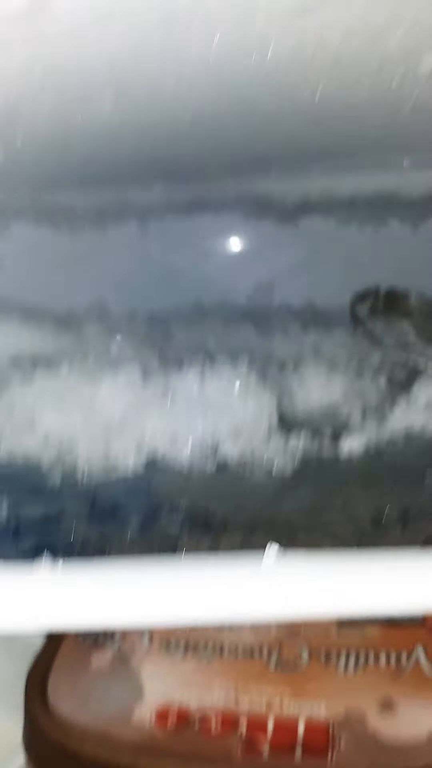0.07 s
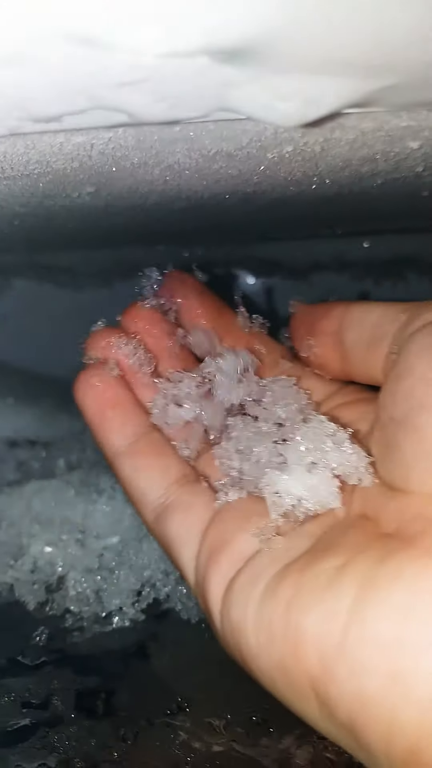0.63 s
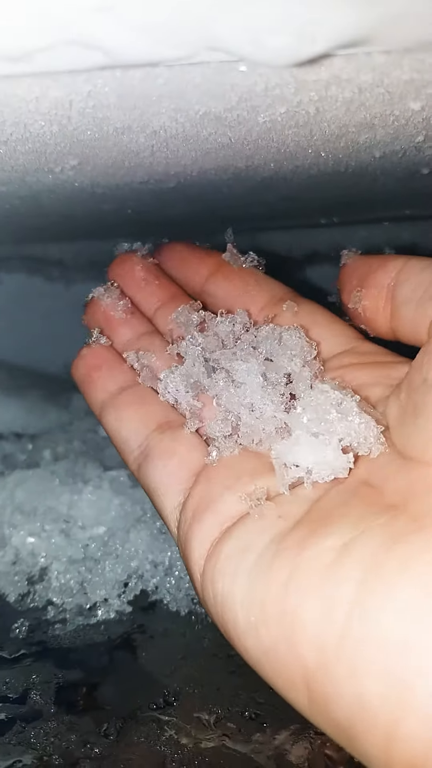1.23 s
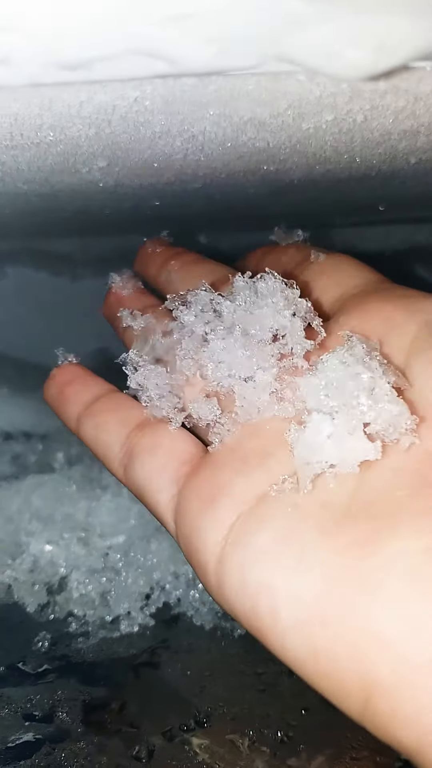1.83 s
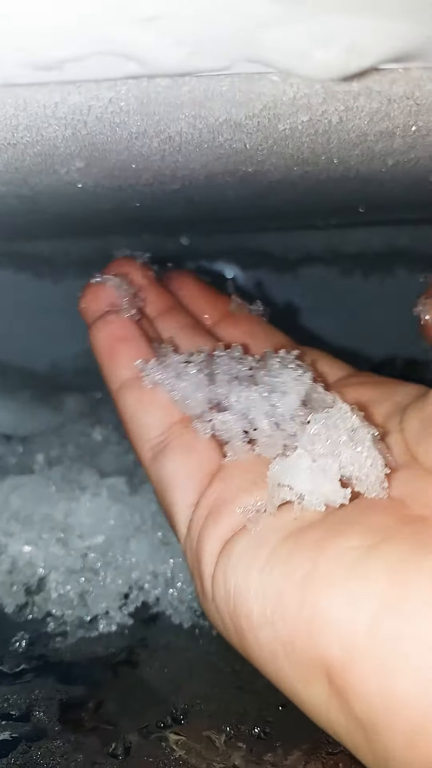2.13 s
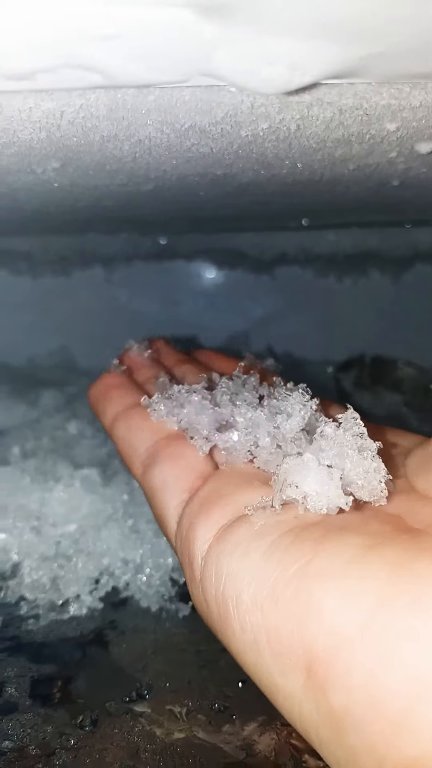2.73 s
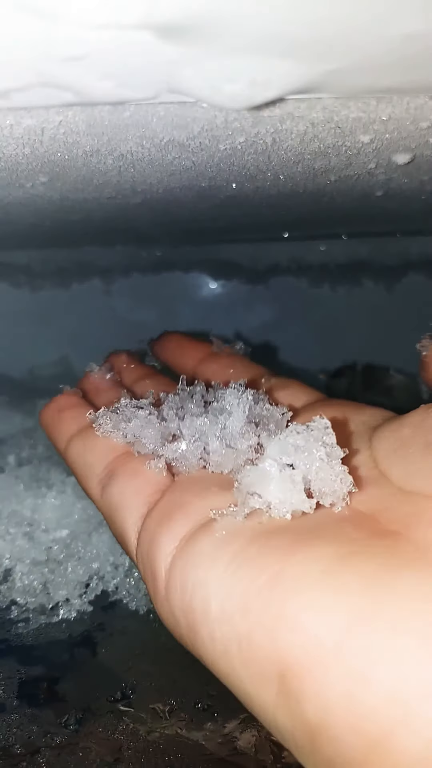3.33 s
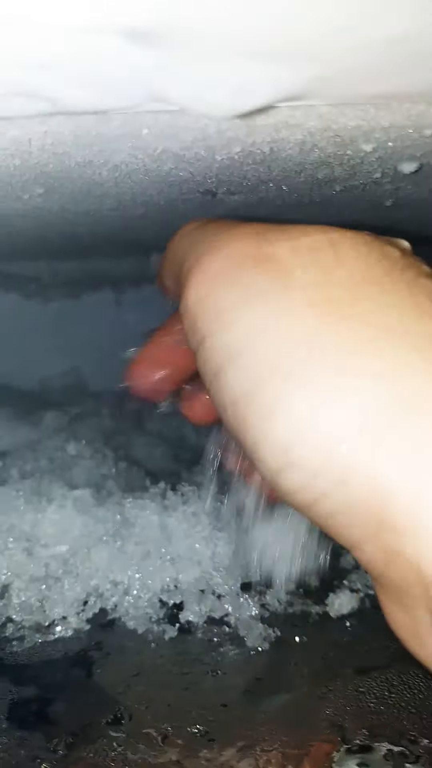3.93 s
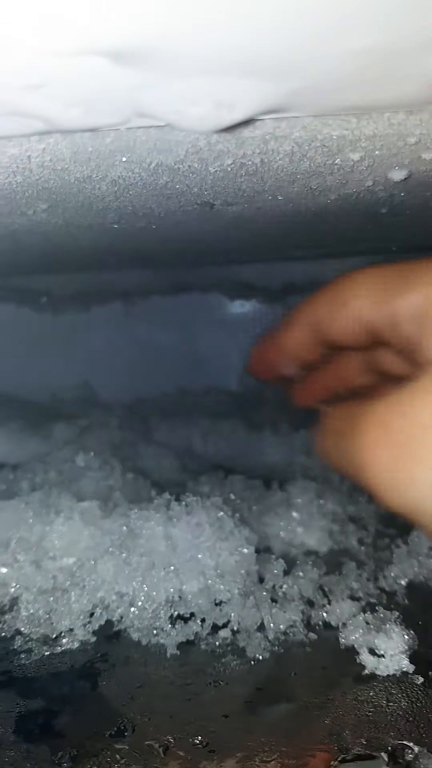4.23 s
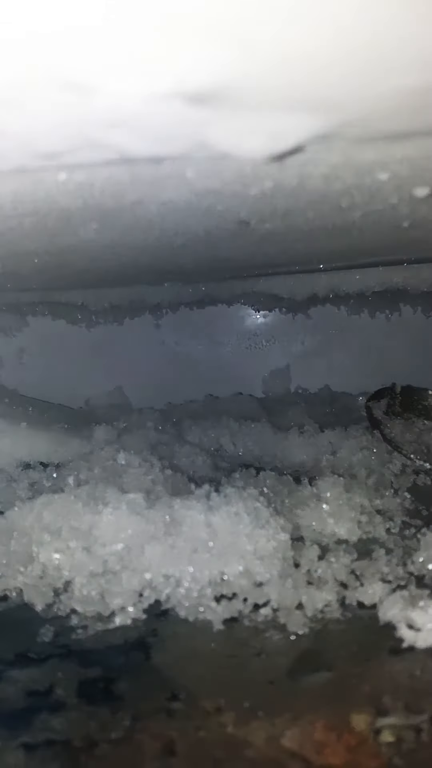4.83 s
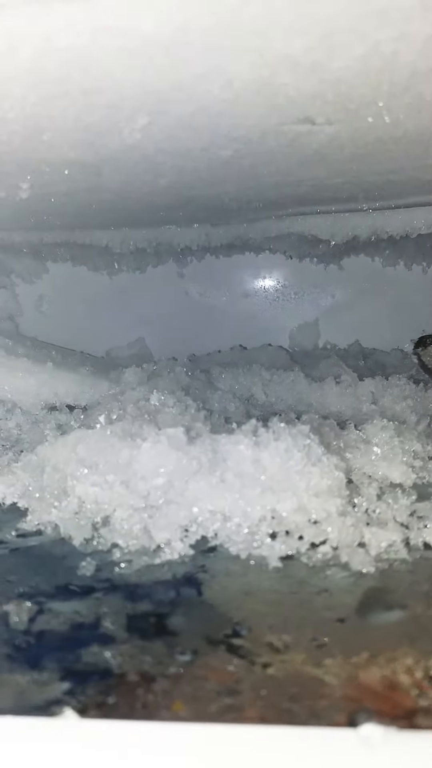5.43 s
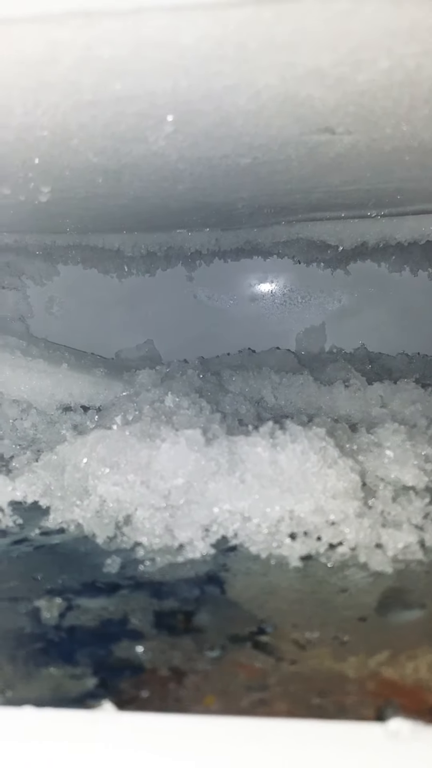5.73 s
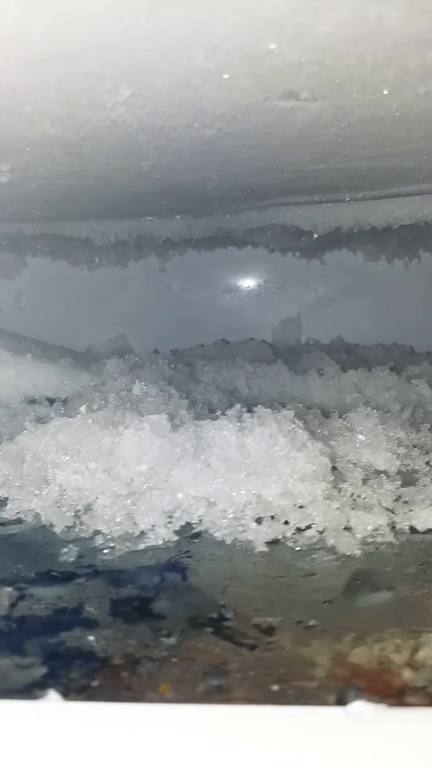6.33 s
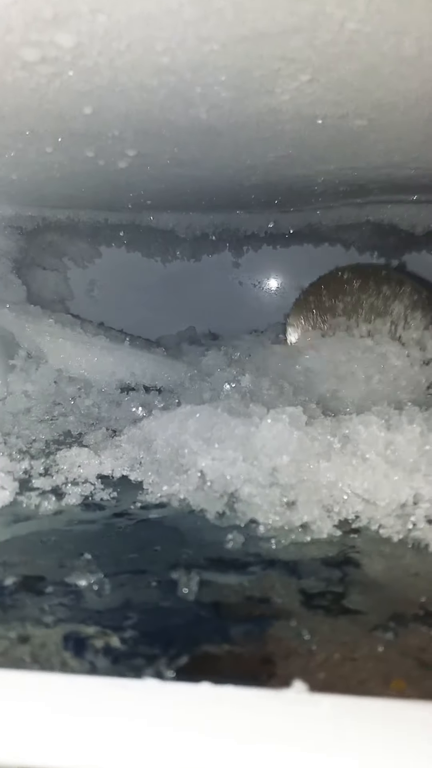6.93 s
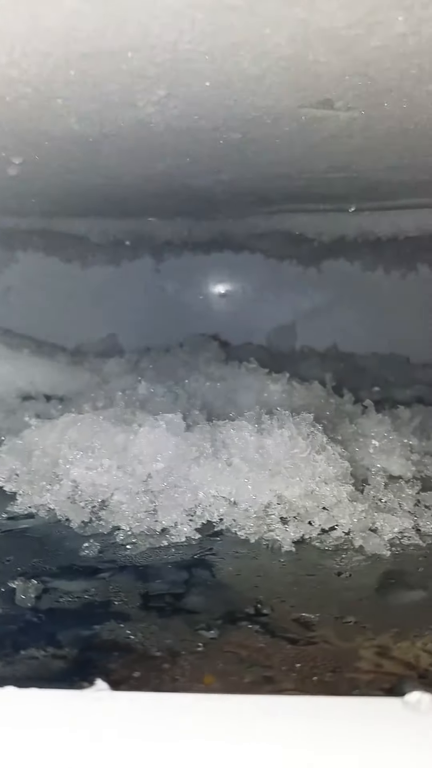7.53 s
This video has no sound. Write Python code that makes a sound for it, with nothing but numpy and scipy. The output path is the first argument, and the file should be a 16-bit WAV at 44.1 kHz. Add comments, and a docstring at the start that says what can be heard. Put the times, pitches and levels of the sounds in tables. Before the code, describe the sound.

A metal spoon scrapes crunchy frost out of a small freezer, snapping ice and knocking on hollow walls over a faint motor hum.

```python
"""First comes a faint crackle of loose frost, close by, over a motor humming in the room.
Then a metal spoon scrapes out a small freezer compartment, push after push. Coarse ice grains
crunch under its edge, fine ones fizz, and later the bare edge sings as crystals catch on it.
Lumps snap off with a spray of splinters, and the spoon knocks on the hollow walls, which thump
and ring. The work is loudest near the end, and the ice and knocks echo briefly in the compartment."""
import sys
import numpy as np
from scipy import signal
from scipy.fft import rfft, irfft
from scipy.io import wavfile

SR = 44100
rng = np.random.default_rng(int(sys.argv[2]) if len(sys.argv) > 2 else 0)


def dump(signal):
    """Clip the signal to [-1, 1] and save it as 16-bit WAV at the path in sys.argv[1]."""
    limited = np.clip(np.atleast_2d(signal).T, -1, 1)
    pcm = np.round(limited * 32767).astype(np.int16)
    wavfile.write(sys.argv[1], SR, pcm)


N = 338688
TIME = np.arange(N) / SR
HIT_TIME = np.arange(SR * 3 // 5) / SR  # seconds since one hit began


def gain_of(db):
    """Turns decibels into a number to multiply a sound by."""
    return 10 ** (np.asarray(db) / 20)


def evened(x):
    """Scales a sound to an average strength (rms) of 1."""
    return x / np.sqrt(np.mean(x ** 2) + 1e-20)


def even_start(x):
    """Scales a dying sound to an average strength of 1 over its first 30 ms."""
    return x / np.sqrt(np.mean(x[:round(.03 * SR)] ** 2) + 1e-20)


def add(mix, s, sound):
    """Mixes a sound in at s seconds."""
    part = mix[max(round(s * SR), 0):][:len(sound)]
    part += sound[:len(part)]


def look_up(points, hz):
    """Reads a table between its rows, on a musical (logarithmic) frequency scale."""
    f, value = np.transpose(points)
    return np.interp(np.log(hz + 1), np.log(f + 1), value)


def colour(x, tone, size=4096):
    """Shapes bass and treble by a tone table, in a way that keeps the start of clicks sharp."""
    log_gain = np.log(gain_of(look_up(tone, abs(np.fft.fftfreq(size, 1 / SR)))))
    taps = np.fft.ifft(np.exp(np.conj(signal.hilbert(log_gain)))).real
    return signal.fftconvolve(x, taps[:size // 2])[:len(x)]


def wander(per_s):
    """A smooth random wobble; a higher per_s makes it quicker."""
    keep_slow = np.exp(-(np.fft.rfftfreq(N, 1 / SR) / per_s) ** 2)
    return evened(irfft(rfft(rng.standard_normal(N)) * keep_slow, N))


def ring(notes, stretch=1):
    """The dying notes of a struck object. A fade time is how long a sound takes to drop 60 dB."""
    return sum((-1) ** k * gain_of(db - 60 * HIT_TIME / fade_s)
               * np.sin(2 * np.pi * hz * stretch * HIT_TIME)
               for k, (hz, db, fade_s) in enumerate(notes))


def burst(fade_s, rise_s=0.00072):
    """A shower of tiny cracks that spreads quickly and dies."""
    noise = rng.standard_normal(len(HIT_TIME))
    return noise * gain_of(-60 * HIT_TIME / fade_s) * (1 - np.exp(-HIT_TIME / rise_s))


def toned_burst(tone, fade_s, rise_s=0.00072):
    """A burst shaped by a tone table."""
    return even_start(colour(burst(fade_s, rise_s), tone))


def clicks(per_s, spread_db):
    """Random clicks, most small and a few large."""
    out = np.zeros(N)
    when, size, sign = rng.random((round(per_s * N / SR), 3)).T
    size_db = spread_db * np.minimum(-np.log(1 - size), 4)
    out[(when * N).astype(int)] = np.sign(sign - .5) * gain_of(size_db)
    return out


def grains(per_s, spread_db, clump_db):
    """Crystals click as they break; clump_db bunches the sound into clumps."""
    return evened(clicks(per_s, spread_db) * gain_of(clump_db * wander(92)))


def chips(per_s, spread_db, lo_hz, hi_hz, cycles, count=20):
    """Ice chips of many sizes, each ringing a few cycles at its own pitch."""
    out = np.zeros(N)
    for hz in np.geomspace(lo_hz, hi_hz, count):
        decay = np.exp(-hz / cycles / SR)
        feedback = [1, -2 * decay * np.cos(2 * np.pi * hz / SR), decay * decay]
        hits = clicks(per_s / count, spread_db) + 1e-12
        out += np.sqrt(hz) * evened(signal.lfilter([1, 0, -1], feedback, hits))
    return evened(out)


def push(start, attack, hold, fall_db_per_s, onset_db=-21):
    """The loudness of one push or touch: it swells, holds and eases off."""
    t = TIME - start
    swell = np.clip(t / max(attack, 1 / SR), 0, 1)
    return (t > 0) * gain_of(onset_db * (1 - swell) - fall_db_per_s * np.maximum(t - attack - hold, 0))


# tone of the air in the room: (frequency [Hz], level [dB])
AIR_TONE = [(25, -9), (60, -12), (100, -7.5), (120, 1.5), (160, -18), (280, -4), (400, -7), (520, -11),
            (1300, -13), (2200, -16), (3200, -24.5), (5500, -31), (7500, -34.5), (16000, -41)]
# the motor's low notes and its thin high ones: (pitch [Hz], level [dB])
HUM_NOTES = [(113, -59), (226, -72.5), (339, -80)]
WHINE_NOTES = [(5652, -91), (5766, -77.5), (5825, -85), (5879, -84), (5992, -81.5), (8140, -92)]
# slow changes of the motor: (time [s], hum change [dB], whine change [dB])
MOTOR_CHANGES = [(0, -0.5, -5), (.7, 1, -3.5), (1.9, -2.5, -0.5), (3.4, -3, -5.5), (3.9, 3.5, -5),
                 (7.7, 5, 1.5)]
def room():
    """Soft air noise, and a motor with a wavering hum and a thin high whine."""
    air = gain_of(-56.5) * evened(colour(rng.standard_normal(N), AIR_TONE)) * gain_of(.5 * wander(4.8))
    drift = 0.14 * wander(1)
    hum = sum(gain_of(db) * evened(np.sin(2 * np.pi * (hz * TIME + drift))) for hz, db in HUM_NOTES)
    whine = sum(gain_of(db) * evened(np.sin(2 * np.pi * (hz * TIME + 0.043 * wander(4.2))))
                for hz, db in WHINE_NOTES)
    times, hum_db, whine_db = np.transpose(MOTOR_CHANGES)
    hum *= gain_of(np.interp(TIME, times, hum_db) + 1.3 * wander(9) - 1)
    whine *= gain_of(np.interp(TIME, times, whine_db) - 0.5)
    return air + hum + whine


# how long the echoes last: (frequency [Hz], fade time [s])
ECHO_FADES = [(150, 0.39), (1000, 0.56), (1900, 0.58), (2600, 0.21), (4000, 0.21), (16000, 0.059)]
def echoes(x):
    """Dense echoes of the compartment and the room outside; the treble dies first."""
    hz, t, bands = signal.stft(rng.standard_normal(len(HIT_TIME)), SR, nperseg=256)
    fade = gain_of(-60 * t / look_up(ECHO_FADES, hz)[:, None])
    tail = signal.istft(bands * fade, SR, nperseg=256)[1][:len(HIT_TIME)]
    tail *= 1 - np.exp(-HIT_TIME / 0.0012)
    return signal.fftconvolve(x, tail / np.linalg.norm(tail))[:N]


# tone of tiny ice splinters: (frequency [Hz], level [dB])
SPLINTER_TONE = [(2000, 3), (4500, 0), (5800, -1.5), (7000, -4), (9300, 1.5), (10800, -6), (16000, -2)]
# tone of a soft, breathy rustle of handling, perhaps a sleeve: (frequency [Hz], level [dB])
RUSTLE_TONE = [(100, -9), (300, 2), (900, -5), (1700, 2.5), (2800, -7), (3300, -10), (3800, 1), (4600, -14),
               (6000, -7), (7500, -19), (16000, -28)]
# light touches before the scraping: (start [s], swell [s], hold [s], crackle [dB], rustle [dB])
LIGHT_TOUCHES = [(.12, 0.045, 0.27, -76, -58.5), (0.385, 0.044, .05, -59, -59.5),
                 (0.546, 0.031, 0.067, -62, -61.5), (.69, 0.044, 0.037, -58.5, -66),
                 (1.8, 0.088, .03, -66, -65)]
def crackle():
    """Separate crystals of loose frost give way under light pressure, over a soft handling rustle."""
    crystals, rustle = np.zeros((2, N))
    for *timing, crackle_db, rustle_db in LIGHT_TOUCHES:
        crystals = np.maximum(crystals, gain_of(crackle_db) * push(*timing, fall_db_per_s=165))
        rustle = np.maximum(rustle, gain_of(rustle_db) * push(*timing, fall_db_per_s=87))
    breaks = colour(grains(per_s=1200, spread_db=3, clump_db=2), SPLINTER_TONE)
    return crystals * evened(breaks) + rustle * evened(colour(rng.standard_normal(N), RUSTLE_TONE))


# the spoon's own notes, muffled by frost: (pitch [Hz], level [dB], fade time [s])
SPOON_NOTES = [(4554, 0, .08), (6132, -3, .07), (7650, -10, .04), (8150, -6, .05), (9030, 0, .06),
               (9260, -5, .04), (11080, -7, .06), (13900, -13, .04)]
def singing(fizz, bare_from_s=5.3, fade_s=0.016):
    """Once bare, the edge catches on hard crystals and sings; pressed into frost, it rings briefly."""
    catches = grains(per_s=500, spread_db=3, clump_db=2)
    out = np.zeros(N)
    for hz, db, _ in SPOON_NOTES[1:]:
        pole = gain_of(-60 / fade_s / SR) * np.exp(2j * np.pi * hz / SR)  # makes each click ring at hz
        contact = gain_of(3 * wander(10))  # as the edge slides, different notes stand out
        out += gain_of(db) * contact * evened(signal.lfilter([1], [1, -pole], catches).imag)
    return gain_of(-9.5) * fizz * (TIME > bare_from_s) * evened(out)


# pushes through the frost: (start [s], swell [s], hold [s], pressure on the wall [dB], fizz [dB])
SPOON_PUSHES = [(3.63, 0.097, 0.077, -52.5, -49.5), (3.906, .008, 0.02, -44, -51),
                (3.987, 0.042, 0.078, -44.5, -46.5), (4.303, 0.0073, 0.11, -44.5, -65.5),
                (4.609, 0.019, 0.035, -46.5, -54), (4.858, 0.14, 0.035, -44.5, -53),
                (5.297, 0.017, 0.016, -42, -52), (5.395, 0.041, 0.14, -44, -51.5),
                (5.602, 0.021, 0.013, -43.5, -53.5), (5.732, 0.02, 0.028, -45.5, -57),
                (5.847, 0.052, 0.085, -43.5, -48.5), (6.0, .04, 0.19, -51, -57),
                (6.285, 0.0072, 0.011, -38.5, -47.5), (6.39, .04, .025, -43, -53),
                (6.47, 0.059, 0.19, -38, -44), (6.646, 0.09, 0.12, -28, -39.5),
                (6.878, 0.028, 0.074, -36.5, -42), (6.996, 0.042, .2, -47, -56.5),
                (7.302, .008, 0.013, -33.5, -51)]
def strokes():
    """Loudness curves for drag, crunch and fizz; the harder the push, the more coarse grains break."""
    drag, crunch, fizz = np.zeros((3, N))
    for *timing, pressure_db, fizz_db in SPOON_PUSHES:
        crunch_db = -52.5 + 0.76 * (pressure_db + 45.5)
        drag = np.maximum(drag, gain_of(pressure_db) * push(*timing, fall_db_per_s=110))
        crunch = np.maximum(crunch, gain_of(crunch_db) * push(*timing, fall_db_per_s=79))
        fizz = np.maximum(fizz, gain_of(fizz_db) * push(*timing, fall_db_per_s=179))
    return drag, crunch, fizz


# tones of coarse grains breaking, and of the shaken wall: (frequency [Hz], level [dB])
CRUNCH_TONE = [(400, -42), (1000, -1), (1700, -2), (2600, -5.5), (3500, -11), (5000, -19), (7000, -17.5),
               (16000, -41)]
DRAG_TONE = [(40, -41), (80, 4.5), (160, 10.5), (220, 7.5), (350, 10), (600, 6), (1000, -1.5), (1600, -2.5),
             (4000, -32)]
# the hollow wall's own notes: (pitch [Hz], level [dB], fade time [s])
WALL_NOTES = [(337.7, 2.5, 0.32), (453.4, -5.5, 0.045), (543, -10.5, 0.067), (688, -16.5, 0.31),
              (932, 15.5, 0.073), (1065.5, 15, 0.078), (1316, 8.5, 0.19), (1510, -7.5, 0.07),
              (1910, 7, 0.19)]
def scraping(drag, crunch, fizz):
    """The edge ploughs through frost: coarse grains crunch, fine ones fizz or ping, the wall shakes."""
    slips = grains(per_s=2900, spread_db=2, clump_db=0)
    clumps = gain_of(3 * wander(37))
    big_chips = chips(per_s=900, spread_db=2.1, lo_hz=1169, hi_hz=6120, cycles=8.1)
    pings = chips(per_s=300, spread_db=5, lo_hz=5000, hi_hz=14800, cycles=30)
    small_chips = chips(per_s=6000, spread_db=3, lo_hz=3480, hi_hz=16800, cycles=4.3)
    coarse = evened(colour(slips + clumps * big_chips, CRUNCH_TONE))
    fine = evened(colour(gain_of(-7.5) * slips + clumps * small_chips + gain_of(-7) * pings,
                         SPLINTER_TONE))
    wall_ring = evened(signal.fftconvolve(slips, ring(WALL_NOTES))[:N])
    wall = evened(colour(slips + gain_of(-14.5) * wall_ring, DRAG_TONE))
    return gain_of(-3) * drag * wall + crunch * coarse + gain_of(-0.5) * fizz * fine


# tone of cracking ice: (frequency [Hz], level [dB])
CRACK_TONE = [(60, -12), (300, -8.5), (900, 1.5), (1600, 4), (2800, -0.5), (4000, -2.5), (5500, -15),
              (7000, -10), (16000, -22)]
# notes of the frozen crust, rung by every crack: (pitch [Hz], level [dB], fade time [s])
CRUST_NOTES = [(1559, -4.5, 0.057), (2497, 1, 0.0091), (2680, 2, 0.063), (2906, 4.5, 0.012),
               (3360, -2.5, 0.028), (4084, -3.5, 0.031), (4595, -3, 0.038), (4930, -10, 0.029),
               (5210, -0.5, 0.015)]
def ice_crack(hz, fade_s, note_db, note_fade_s):
    """One crack: a burst of tiny breaks, the ringing crust and the note of the broken piece."""
    crust_ring = ring(CRUST_NOTES, stretch=rng.uniform(.92, 1.08))
    crust = even_start(signal.fftconvolve(burst(0.0042), crust_ring)[:len(HIT_TIME)])
    piece = even_start(ring([(hz, 0, note_fade_s)]))
    crack = toned_burst(CRACK_TONE, fade_s) + gain_of(note_db) * piece + gain_of(-2) * crust
    return crack / abs(crack).max()


# tone of loose ice rattling on the wall: (frequency [Hz], level [dB])
RATTLE_TONE = [(100, -49), (300, -16), (600, 1), (1400, -2), (2500, -14), (6000, -50)]
# lumps of ice snapping, and at the very end a light tap of the spoon: (time [s], level [dB], pitch [Hz],
# splinters [dB])
ICE_SNAPS = [(0.297, -59, 3500, -52), (0.4453, -51, 2220, -49.5), (0.529, -50, 5400, -51.5),
             (1.8982, -47, 2100, -58), (3.724, -50, 3000, -46), (3.778, -35.5, 2100, -40.5),
             (3.8878, -57, 2300, -50), (4.0228, -24.5, 2180, -52), (4.034, -25, 3400, -50),
             (4.0461, -23.5, 3850, -37), (4.0886, -28, 3160, -45), (4.1836, -34, 2190, -56),
             (4.309, -39, 2040, -70), (4.617, -40.5, 2350, -53), (4.9156, -43, 2890, -51.5),
             (5.4255, -40, 2080, -52), (5.444, -45, 2470, -40.5), (5.506, -35, 5500, -40),
             (5.759, -38, 2010, -52), (5.792, -24, 3360, -44.5), (6.2951, -18, 2580, -34),
             (6.381, -30, 2350, -52), (6.54, -20, 2140, -45), (6.562, -23.5, 2250, -52),
             (6.6001, -20, 2820, -45), (6.6641, -15, 2420, -53), (6.6729, -12, 2470, -52),
             (6.74, -20, 4250, -37), (6.7467, -20, 3970, -40), (6.7631, -11, 2720, -38),
             (6.786, -18, 2730, -42), (6.8286, -13, 2540, -49), (6.8499, -12, 2430, -38),
             (6.8721, -13.5, 2310, -50), (6.8961, -23, 2270, -38), (6.932, -42, 4120, -37.5),
             (6.972, -23.5, 4100, -51), (7.67, -18, 2360, -35)]
def snaps():
    """Lumps break off with a spray of splinters and jolt the wall; at the very end the spoon taps once more."""
    out = np.zeros(N)
    for s, db, hz, splinter_db in ICE_SNAPS:
        crack = ice_crack(hz, fade_s=0.039, note_db=-0.5, note_fade_s=0.035)
        jolt = gain_of(-20.5) * toned_burst(DRAG_TONE, fade_s=0.16)
        rattle = gain_of(-23.5) * toned_burst(RATTLE_TONE, fade_s=0.063)
        spray = toned_burst(SPLINTER_TONE, fade_s=0.014, rise_s=0.0034)
        add(out, s, gain_of(db - 2.5) * (crack + jolt + rattle) + gain_of(splinter_db - 5.5) * spray)
    return out


# tone of a dull knock on one wall panel: (frequency [Hz], level [dB])
KNOCK_TONE = [(60, -26), (150, -15), (260, 3.5), (500, -1.5), (900, -8.5), (2500, -46.5)]
# notes of the whole compartment bending, retuned per knock: (pitch [Hz], level [dB], fade time [s])
THUMP_NOTES = [(141.3, 4, 0.22), (294, -25, .35), (479, -27, 0.25), (703, -25, 0.58)]
# the spoon meets the wall: (time [s], crack [dB], thump [dB], thump pitch [Hz], panel [dB],
# panel pitch [Hz], panel fade time [s], clatter [dB], spoon ring [dB])
WALL_KNOCKS = [(3.9194, -15.5, -41.5, 176, -46.5, 274, 0.13, -60, -46),
               (4.6608, -27.5, -47, 125, -35, 352.5, 0.21, -39.5, -62),
               (5.0138, -33, -56, 208, -38, 290.7, 0.24, -45, -67),
               (5.5225, -24, -56, 108, -41, 353, 0.33, -38, -48),
               (5.5698, -24.5, -52, 175, -36.5, 373, 0.28, -40, -45),
               (5.6516, -27, -46.5, 120.7, -35.5, 365, 0.13, -35, -54),
               (5.9126, -28.5, -49, 196, -37, 365, 0.12, -49, -60),
               (6.2998, -4, -23.5, 136.3, -35, 353, 0.13, -29.5, -42),
               (6.4551, -4, -33, 150.4, -18, 342, 0.23, -13, -31.5),
               (6.4746, -9, -37, 128, -21, 356, 0.13, -20.5, -36),
               (6.6775, -14.5, -31.5, 139, -29.5, 397, 0.079, -21, -59),
               (6.6968, -6.5, -31.5, 177.6, -37, 286, 0.22, -28, -55),
               (6.7569, 0, -29, 174.6, -26.5, 376, 0.23, -15.5, -52),
               (7.308, -12.5, -29.5, 183, -22.5, 299.8, 0.17, -35, -40),
               (7.324, -12, -22, 137.6, -28, 315.5, 0.5, -48, -62)]
def knocks(crust_hz=2387):
    """The spoon breaks through to the wall, whose pitch and fade depend on where it is pressed."""
    out = np.zeros(N)
    spoon, upper_wall = even_start(ring(SPOON_NOTES)), even_start(ring(WALL_NOTES[3:]))
    for s, db, thump_db, thump_hz, panel_db, panel_hz, fade_s, clatter_db, spoon_db in WALL_KNOCKS:
        piece_hz = crust_hz * (1 + 0.026 * rng.uniform(-1.17, 1))
        crack = ice_crack(piece_hz, fade_s=0.018, note_db=0.5, note_fade_s=0.023)
        # the whole compartment bends, and takes a moment to start
        swell = 1 - np.exp(-HIT_TIME / 0.0095)
        thump = even_start(ring(THUMP_NOTES, thump_hz / THUMP_NOTES[0][0]) * swell)
        # the struck panel answers with its lowest notes
        low_notes = [(hz, note_db, fade_s) for hz, note_db, _ in WALL_NOTES[:4]]
        panel = even_start(ring(low_notes, panel_hz / WALL_NOTES[0][0]))
        panel = even_start(panel + gain_of(-5) * toned_burst(KNOCK_TONE, fade_s=.06))
        # loose ice rattles along with the wall's higher notes
        clatter = even_start(upper_wall + gain_of(3.5) * toned_burst(RATTLE_TONE, fade_s=0.047))
        wall = gain_of(thump_db) * thump + gain_of(panel_db - 1.5) * panel
        wall += gain_of(clatter_db - 6.5) * clatter
        add(out, s, gain_of(db - 5.5) * crack + wall + gain_of(spoon_db - 3) * spoon)
    return out


def scene():
    """Spoon and ice echo inside the compartment, over the hum of the room."""
    drag, crunch, fizz = strokes()
    ice = knocks() + snaps() + scraping(drag, crunch, fizz) + singing(fizz) + crackle()
    return (ice + gain_of(-13) * echoes(ice) + room())[None]


# the microphone's bass cut: (frequency [Hz], level [dB])
MIC_TONE = [(15, -47), (40, -8), (70, -1), (16000, -2)]
def record(dry):
    """The microphone weakens the deep bass, and the very highest treble is cut off."""
    treble_cut = signal.firwin(511, 15950, window=("kaiser", 9), fs=SR)
    return signal.oaconvolve(colour(dry[0], MIC_TONE), treble_cut, "same")[None]


dry = scene()
out = record(dry)
dump(out)
```